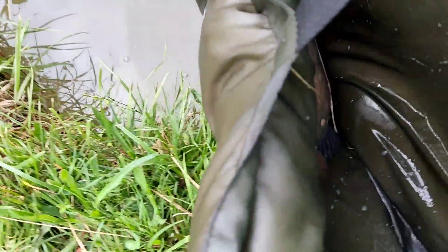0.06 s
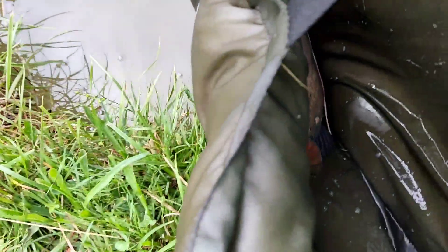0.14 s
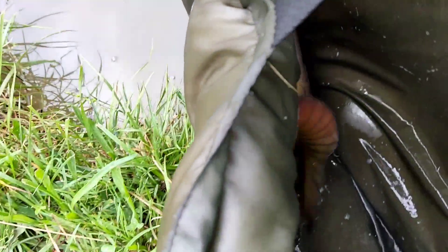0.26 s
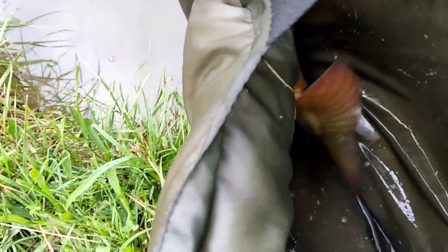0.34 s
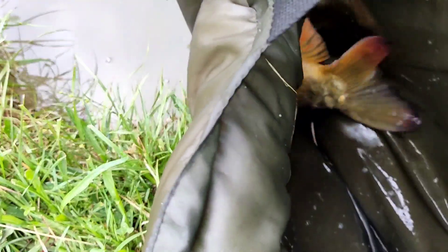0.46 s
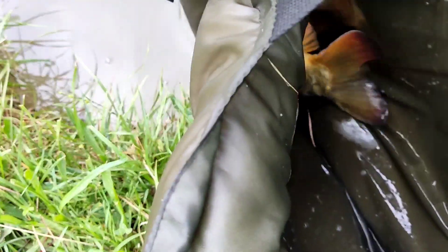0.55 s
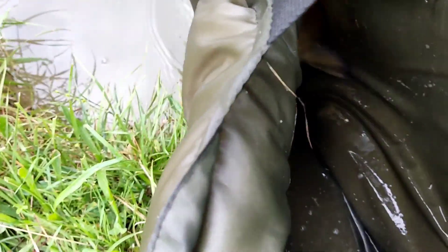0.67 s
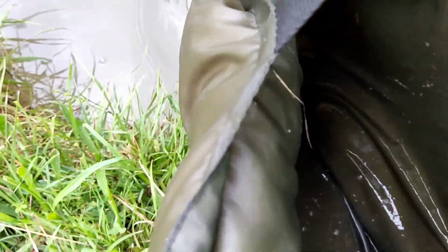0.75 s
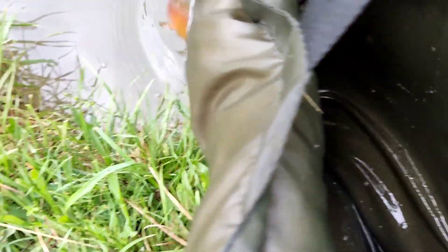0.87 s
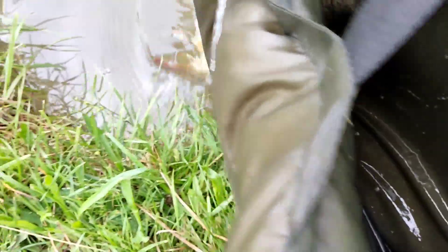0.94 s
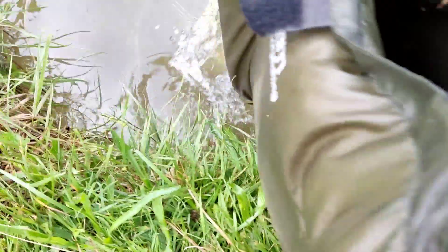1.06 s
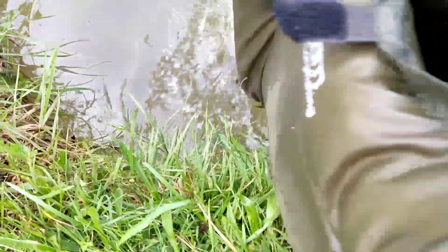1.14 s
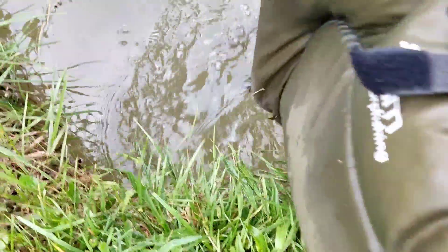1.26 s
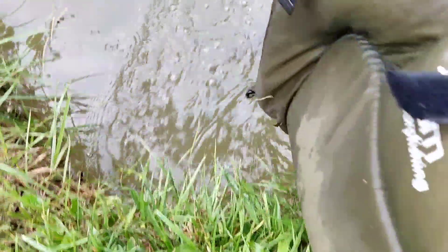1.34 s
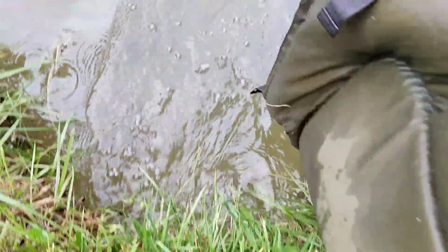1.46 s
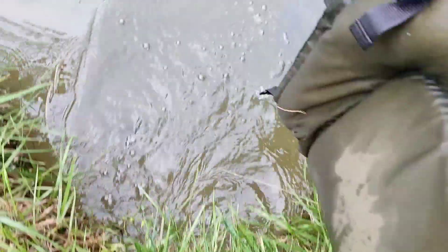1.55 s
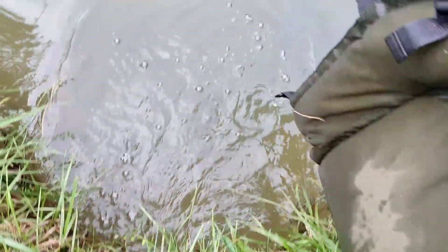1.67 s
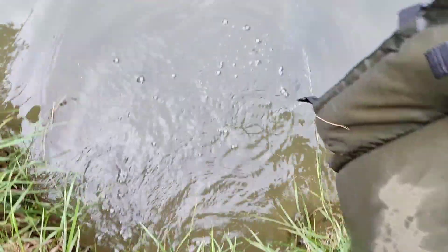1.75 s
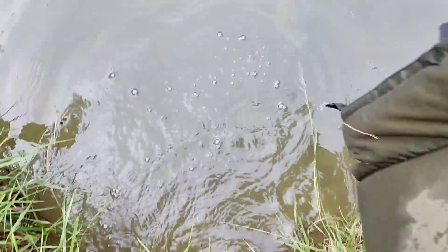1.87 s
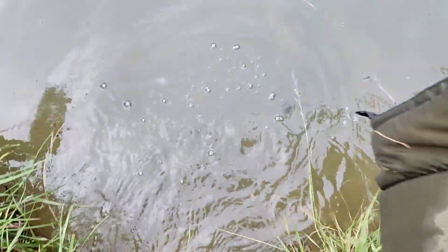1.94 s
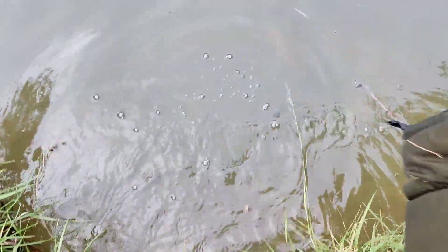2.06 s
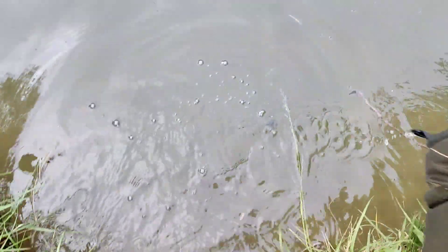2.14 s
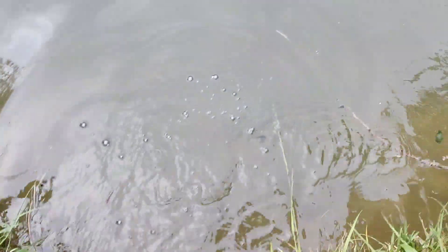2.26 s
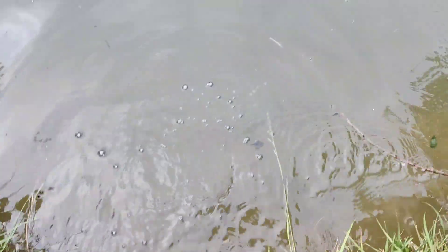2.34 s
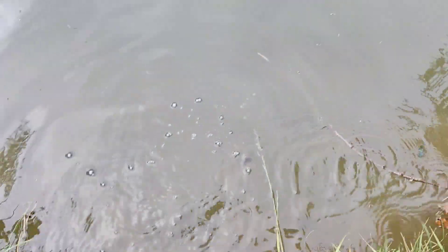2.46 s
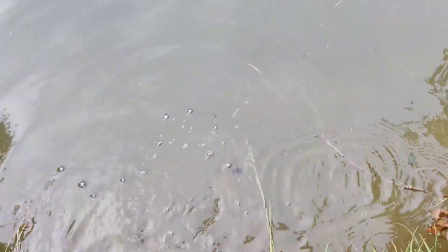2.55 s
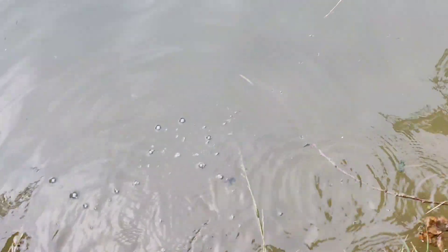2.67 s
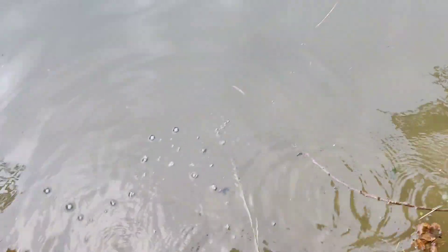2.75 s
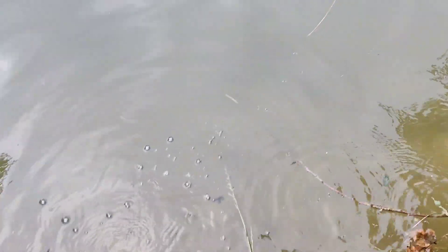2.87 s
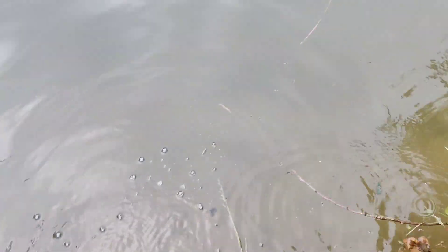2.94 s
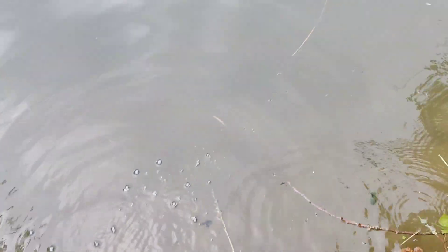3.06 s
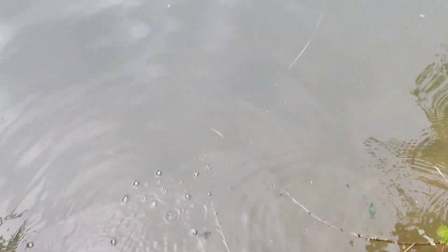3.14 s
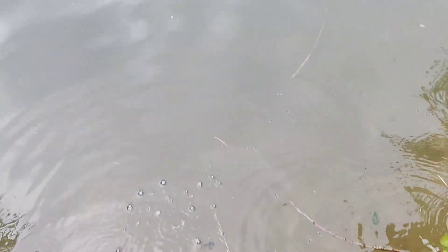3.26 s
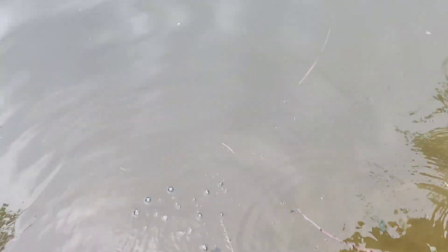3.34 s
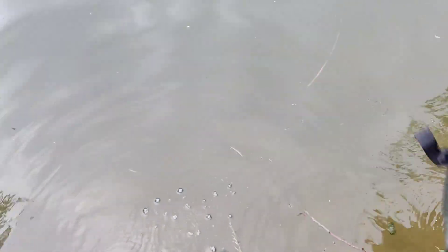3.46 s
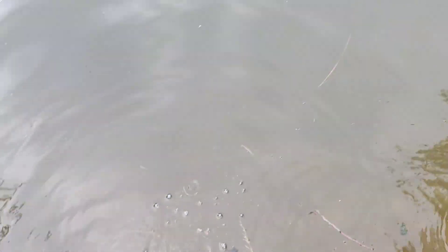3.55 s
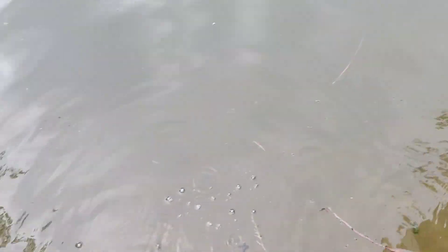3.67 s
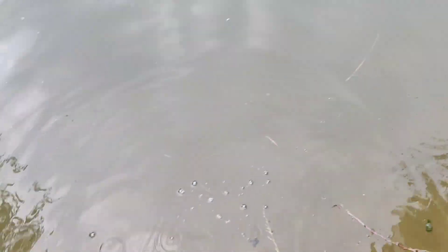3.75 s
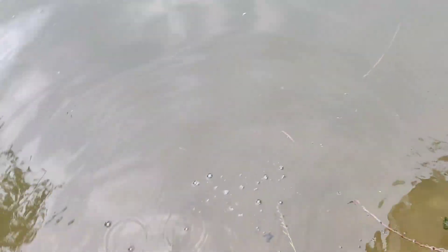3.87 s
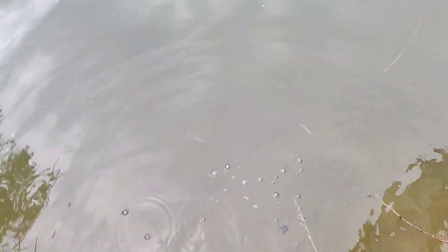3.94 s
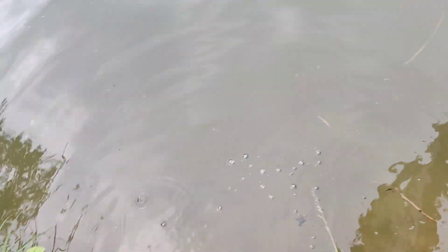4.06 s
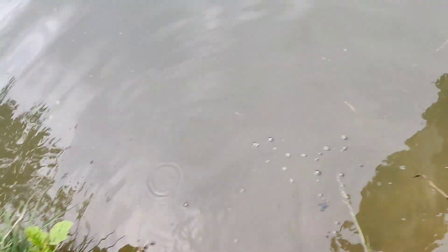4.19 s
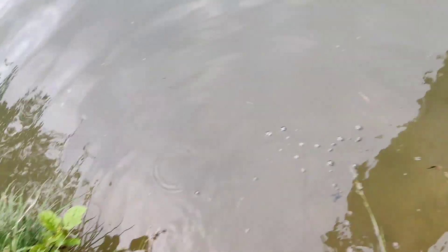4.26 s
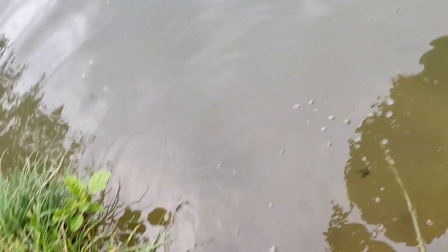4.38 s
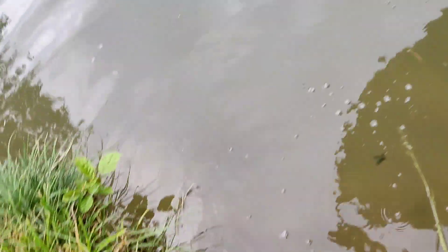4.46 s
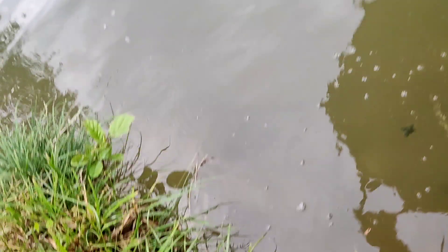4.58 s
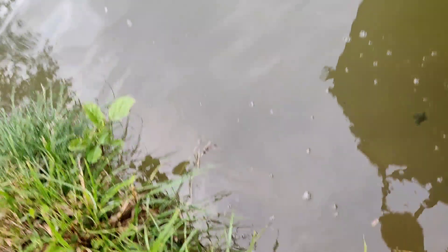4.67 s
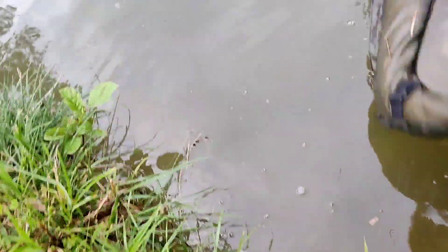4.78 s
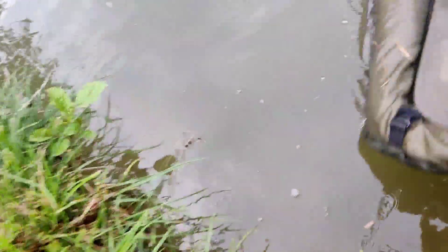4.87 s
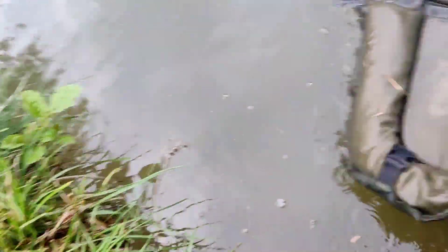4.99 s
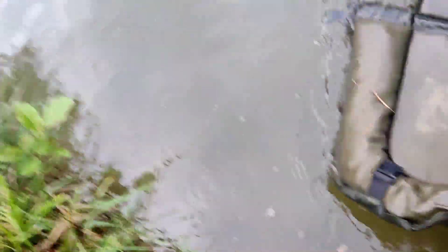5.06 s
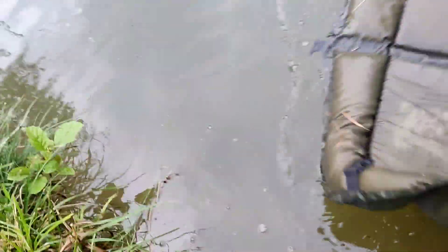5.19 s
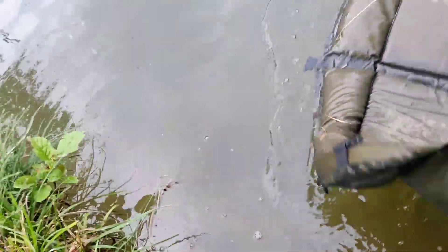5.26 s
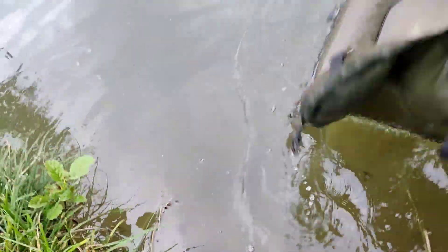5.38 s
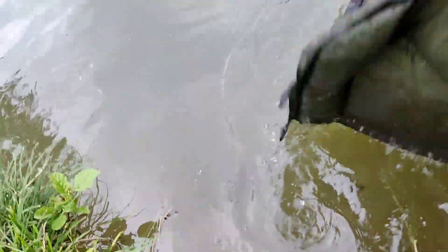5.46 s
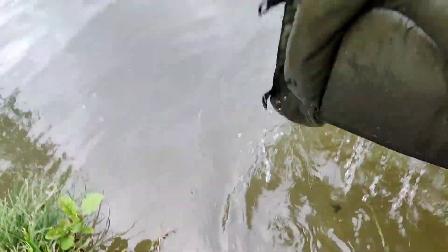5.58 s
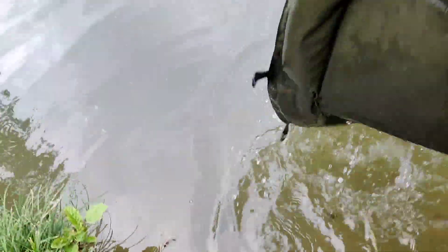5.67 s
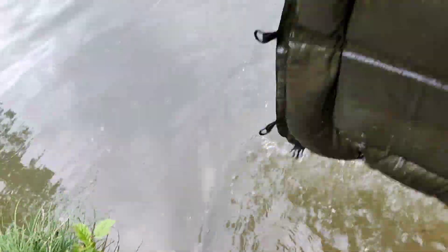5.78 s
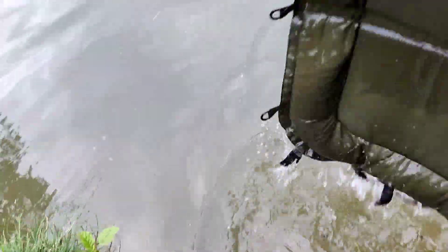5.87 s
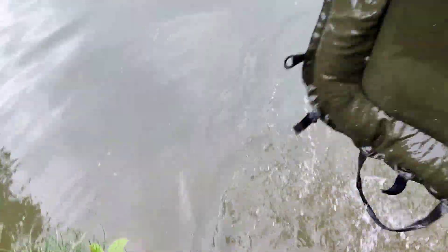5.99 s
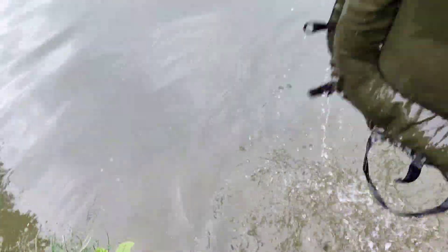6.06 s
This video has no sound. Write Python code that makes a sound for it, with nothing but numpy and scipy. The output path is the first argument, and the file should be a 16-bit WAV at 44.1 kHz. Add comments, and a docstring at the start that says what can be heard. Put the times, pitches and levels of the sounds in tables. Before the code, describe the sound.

A close, dry outdoor stereo perspective at a pond edge. From 0 to 0.85 s, wet fabric rustles softly with dull drag and airy hiss, with low wind bumps. At 0.9-1.5 s a lively splash erupts: sharp cloth snaps, plops, rising gurgles and crackling droplets, mostly centre to left. It thins to light rustle and drips by 2 s. Between 2 and 3.3 s a small bird gives thin, high, mostly falling whistles to the right, with one faint note near 4.05. Rustle swells around 3.1 and 3.5; a crisp tick lands at 4.0. At 4.75 a clustered, low wet slap thuds and sprays, leaving small gurgles. Soft swishing swells near 5.3 and 5.5, then from 5.7 to 6.1 strong rustling, bright snaps, bubbles and fine draining water. Faint traffic hum and leaf hiss continue throughout.

```python
"""Wet sling at a pond edge

A wet fishing sling is handled close to a phone with two microphone ports: shaped noise rustles,
short noise bursts snap, damped sines gurgle, and it slaps the surface with thuds and spray, then drains.
A small bird sings to the right in gliding sines. Filtered noise makes light wind buffeting the ports,
a far traffic hum and a hiss of leaves."""
import sys
import numpy as np
from scipy import signal
from scipy.fft import rfft, irfft, next_fast_len
from scipy.io import wavfile
from scipy.ndimage import uniform_filter1d, map_coordinates

SR = 44100
rng = np.random.default_rng(int(sys.argv[2]) if len(sys.argv) > 2 else 0)


def generate_wav(sig):
    """Save sig (samples, or channels by samples) to the path in sys.argv[1] as 16-bit PCM at SR."""
    pcm = np.round(np.clip(np.atleast_2d(sig).T, -1, 1) * 32767).astype(np.int16)
    wavfile.write(sys.argv[1], SR, pcm)


N = 270013

# Wind buffeting: t/s, level/dB
WIND_LEVEL = [(0, -47), (.26, -55.5), (.37, -39), (.54, -41.5), (.86, -50), (1.09, -41), (1.66, -50),
              (2.55, -51), (2.64, -43), (3.14, -53.5), (3.81, -47), (4.1, -47.5), (4.2, -44), (4.28, -49.5),
              (4.55, -40), (4.65, -47), (4.72, -40), (4.84, -46.5), (5.3, -48.5), (6.12, -49.5)]
# Snaps of wet fabric and droplets: t/s, bright level/dB, left-right/dB, knock relative to bright/dB, bright T60/s
SNAPS = [(.808, -33.5, 6, -8, 0.047), (0.9334, -20.5, 0.5, -7, 0.02), (1.0179, -20.5, -6, 1, 0.014),
         (1.026, -20.5, -5.5, -24, 0.014), (1.05, -15.5, -13, -13.5, 0.0083),
         (1.068, -27.5, -5, -15, 0.035), (1.108, -27, -5.5, -1.5, 0.027), (1.114, -28.5, -22, -23, 0.013),
         (1.168, -35, -7, -22, 0.0054), (1.1938, -35, -15, 2, 0.028), (1.306, -21, -4.5, -21, 0.011),
         (1.408, -30, -12, -25, 0.0076), (1.43, -33, -16, -7, 0.025), (1.448, -29, -4.5, -6.5, 0.019),
         (1.482, -31.5, -7.5, -6, 0.018), (1.779, -33, 3, -4, 0.009), (2.0127, -24.5, -1, -17, 0.0057),
         (2.034, -40, 0.5, -3, 0.032), (2.5763, -30.5, 2.5, -9.5, 0.007), (3.065, -32.5, 10, -37, 0.052),
         (3.5154, -35, -1, 3.5, 0.035), (3.9802, -16.5, -1.5, -18.5, 0.0031),
         (4.1267, -49, -9, -12, 0.0057), (4.138, -33, 2, -13, 0.0087), (4.1612, -36.5, 10, -13, 0.0094),
         (4.347, -36.5, 15, -20, 0.0079), (4.359, -35.5, 9, -14, 0.014), (4.971, -22.5, -1, -9, 0.0057),
         (5.07, -20, 3, -46.5, 0.0098), (5.5134, -21, 5, -7, 0.0094), (5.5289, -30.5, 16, -11, 0.015),
         (5.723, -12, -1, -31, .011), (5.778, -23.5, -1, -9, 0.026), (5.7867, -18.5, -7, -3, 0.009),
         (5.9117, -8.5, -1.5, -43, 0.0062), (5.946, -26, 2, -25, .008)]
# Air bubbles in moving water, before flutter and echo:
# t/s, level/dB, f/Hz, cycles, pitch rise over those cycles/fraction
BUBBLES = [(0.918, -21.5, 487, 2.8, 0), (.934, -17, 610, 1.2, 0.2), (.968, -38, 540, 7.9, 0),
           (.993, -21, 750, 3.4, 0), (1.019, -26, 289, 7.2, 0.3), (1.021, -26.5, 1267, 14, 0),
           (1.053, -37, 2950, 32, 0.05), (1.055, -34, 442, 10, 0.02), (1.087, -29, 1300, 6, 0),
           (1.109, -13, 1150, 3.2, 0), (1.113, -32, 753, 10, 0.14), (1.201, -29, 905, 5.3, 0),
           (1.253, -34.5, 1096, 14, 0), (1.282, -34, 2080, 19, 0.02), (1.311, -39, 1220, 15, 0.3),
           (1.436, -37.5, 602, 14, 0.13), (1.475, -34.5, 1310, 16, 0.41), (1.512, -46, 1060, 29, 0.22),
           (4.468, -39, 480, 4.5, 0.03), (4.797, -35, 563, 11, 0.01), (4.83, -35, 730, 6.4, 0.1),
           (4.851, -43, 1040, 11, .4), (4.885, -47, 2150, 20, .06), (4.93, -46, 743, 9.3, 0),
           (4.951, -45.5, 1174, 31, 0), (5.031, -42.5, 960, 7.5, .3), (5.076, -47.5, 1180, 11.5, 0.33),
           (5.18, -26.5, 780, 1.2, 0), (5.512, -41, 1890, 15, 0.1), (5.712, -41.5, 770, 30, 0.1),
           (5.772, -30.5, 168, 5, 0.22), (5.79, -36, 748, 37, 0.01), (5.836, -25.5, 684, 12.4, 0),
           (5.922, -32, 1650, 8.9, 0.1)]
# Folds landing one after another in the slap: t/s, spray level/dB, thud level/dB, thud f/Hz
SLAP_FOLDS = [(4.7515, -16.5, -1.5, 210), (4.756, -11, -17, 232), (4.7623, -20.5, -6, 185),
              (4.769, -10.5, -5.5, 520), (4.775, -16.5, -20, 296), (4.779, -17, -7, 225),
              (4.783, -25, -6.5, 296), (4.789, -39, -17, 250)]
# Whistles, before quaver, echo and panning:
# t/s, length/s, first f/Hz, last f/Hz, bend (over 1 glides late), level/dB
WHISTLES = [(1.978, 0.19, 7800, 7100, 0.34, -52.5), (2.189, 0.13, 7270, 6340, 1.6, -51),
            (2.391, 0.1, 6800, 5870, 1.1, -53), (2.393, 0.12, 7220, 6810, 1.6, -55.5),
            (2.4, 0.088, 8200, 7400, 2.5, -52), (2.579, .1, 6550, 5370, 0.92, -55.5),
            (2.776, 0.062, 5420, 5500, 1.3, -69), (2.85, 0.045, 6300, 5870, .7, -59),
            (2.895, 0.115, 5850, 6280, .9, -57.5), (3.258, 0.05, 5880, 5900, 1, -58),
            (4.04, 0.07, 5040, 4170, 0.37, -64)]
# Spectrum of fabric hiss and leaves: f/Hz, relative level/dB
HISS_SPECTRUM = [(2000, -18.5), (3000, -7.5), (4300, -8), (5200, -5), (7400, 1), (8500, 7), (9500, 5),
                 (11100, 5), (13000, -2.5), (14300, -7), (14450, -66)]
# Spectrum of the dull cloth drag: f/Hz, relative level/dB
DRAG_SPECTRUM = [(120, -8), (200, -9.5), (443, -4), (709, -5), (812, -5), (1180, -5), (1610, -5.5),
                 (2760, -8), (5000, -10.5), (6500, -11), (11000, -120)]
# Spectrum of the wind: f/Hz, relative level/dB
WIND_SPECTRUM = [(12, 1.5), (20, 7), (64, -2.5), (167, -12.5), (260, -19.5), (340, -57), (570, -120)]
# Spectrum of the far traffic: f/Hz, relative level/dB
TRAFFIC_SPECTRUM = [(60, -5), (100, -0.5), (205, 15.5), (400, -2), (1000, -4.5), (5000, -82)]
# Resonances of the two ports: f/Hz, left-right/dB
PORT_RESONANCE = [(300, 0.3), (1400, 0.9), (4000, -0.8), (6500, -2), (8300, -7.5), (9600, -2), (11100, 13),
                  (13200, 8)]
# Likeness of broad noise at the two ports: f/Hz, correlation
LIKENESS = [(150, 0.87), (600, 0.52), (2000, 0.043), (5000, 0.042), (12000, 0.14)]
# Draining water: t/s, level/dB
POUR_LEVEL = [(5.68, -64), (5.74, -51), (5.8, -41.5), (5.93, -43), (6.0, -43), (6.12, -48.5)]
# Moves of the sling, each a swell of rustle:
# t of full level/s, rise/s, hold/s, hiss fade/(dB/s), hiss level/dB, drag level/dB
MOVES = [(0.51, 0.88, 0.34, 60, -46, -48), (0.947, 0.054, .005, 97, -39, -43.5),
         (1.054, 0.14, 0.11, 109, -41, -47), (1.287, 0.095, .005, 90, -40.5, -43.5),
         (1.442, 0.063, 0.0041, 195, -41.5, -41.5), (1.486, 0.041, 0.024, 27, -51.5, -57),
         (1.625, 0.052, 1, 52, -54, -60.5), (2.02, 0.078, .005, 41, -49.5, -62),
         (2.38, 0.17, .005, 67, -50.5, -74), (2.817, 0.97, 0.015, 160, -48, -53),
         (3.068, 0.22, .005, 102, -46, -77), (3.147, 0.17, 0.023, 57, -42, -45.5),
         (3.48, 0.46, .005, 51, -48.5, -47.5), (3.51, 0.028, 0.15, 59, -37, -43),
         (4.156, 0.78, 0.0045, 106, -55, -59), (4.38, 0.24, 0.058, 64, -54.5, -56.5),
         (4.608, 0.21, .005, 232, -46, -60), (4.766, 0.074, .005, 43, -36, -42),
         (5.266, 0.37, .005, 58, -43, -51.5), (5.526, 0.28, .005, 65, -50, -49),
         (5.703, 0.79, .005, 57, -43, -51), (5.773, 0.15, 0.17, 109, -35, -42.5),
         (6.02, 0.044, .005, 12, -42, -47.5)]
# Position of the sling: t/s, left-right/dB
SLING_SIDE = [(0, -1), (.6, 1.5), (1.05, -4.5), (1.45, -1.5), (1.57, 3), (2.5, 1.5), (3.1, 6), (4.6, 1.5),
              (5.7, 2.5), (5.93, -2), (6.12, 1.5)]
# Share of flying droplets: t/s, share (0-1)
WETNESS = [(.85, .4), (.95, 1), (1.5, 1), (2.1, .4), (5.6, .4), (5.75, .6)]
# Spectra of the snap's crack and knock, and of the slap's spray: f/Hz, relative level/dB
CRACK_SPECTRUM = [(2500, -23), (4000, -3.0), (7000, 7), (9000, 13), (11500, 9.5), (14000, -2.0), (16000, -49.0)]
KNOCK_SPECTRUM = [(200, 5.0), (500, -0.5), (1500, 0.5), (3500, -0.5), (5000, 3.5), (8000, -37)]
SPRAY_SPECTRUM = [(300, -2.5), (800, -8.5), (2000, -15.5), (3500, -3.0), (6500, -17), (9000, 3.5),
                  (11500, -6.5), (14300, -19), (14700, -59)]
# Likeness of the wind and of the leaves at the two ports: f/Hz, correlation
WIND_LIKENESS = [(30, 0.014), (70, 0.74), (130, 0.81)]
LEAF_LIKENESS = [(1000, .2)]

TOP_HZ = 15520  # band limit of both ports
RISE_DB = 20  # a move climbs this far during its rise
DRAG_FADES = 1.35  # the drag dies this many times faster than the hiss
NOTE_EDGE_S = 0.0021  # fade at each end of a whistle
SLING_LEAD_S = 0.000289  # lead at the left port for cloth on the left


def amp(db):
    """Gain of a level in dB."""
    return 10 ** (np.asarray(db) / 20)


def unit(x):
    """x at rms 1."""
    return x / np.sqrt(np.mean(x ** 2) + 1e-20)


def along(points, hz):
    """Read (Hz, value) points on a log frequency axis."""
    f, v = np.transpose(points)
    return np.interp(np.log(hz + 1), np.log(f + 1), v)


def curves(rows):
    """One value per sample for each column after the time."""
    s, *cols = np.transpose(rows)
    return [np.interp(np.arange(N) / SR, s, c) for c in cols]


def wobble(rate):
    """A smooth random curve, rate knots a second."""
    knots = rng.standard_normal(int(N * rate / SR) + 4)
    return map_coordinates(knots, [np.arange(N) * rate / SR])


def filtered(x, response):
    """x shaped by a complex response of frequency."""
    m = next_fast_len(N + SR // 2)
    return irfft(rfft(x, m) * response(np.fft.rfftfreq(m, 1 / SR)), m)[..., :N]


def sides(pan_db):
    """Left and right gains for a left-right difference in dB."""
    return amp(np.array([pan_db, -pan_db]) / 2)


def lead(x, s):
    """The left port hears s seconds before the right."""
    return filtered(x, lambda hz: np.exp(1j * np.pi * s * hz * np.array([[1], [-1]])))


def add(out, s, x):
    """Mix x into out from time s."""
    part = out[..., round(s * SR):][..., :x.shape[-1]]
    part += x[..., :part.shape[-1]]


def echo(x, t60):
    """A scattered noise tail, different at each port, scaled to energy 1 at the left."""
    t = np.arange(SR // 3) / SR
    tail = rng.standard_normal((2, len(t))) * amp(-60 * t / t60)
    return signal.fftconvolve(x[None], tail / np.linalg.norm(tail[0]), axes=1)[:, :N]


def rush(spectrum, alike, patchy_db, lead_s, grain=1):
    """Stereo noise of rms 1 with patches of random gain, lead_s earlier at the left port."""
    z = signal.stft(rng.standard_normal((2, N + 512)), nperseg=512)[2]
    # patches spread over neighbouring frequencies and moments
    field = uniform_filter1d(rng.standard_normal(z.shape[1:]), size=6, axis=0)
    field = uniform_filter1d(field, size=8, axis=1)
    patchy = signal.istft(z * amp(patchy_db * unit(field)), nperseg=512)[1][:, :N]

    def mid_side(hz):
        # this balance of mid and side gives the wanted correlation
        turn = np.arccos(np.clip(along(alike, hz), -1, 1)) / 2
        return amp(along(spectrum, hz)) * [np.cos(turn), np.sin(turn)]

    mid, side = filtered(grain * patchy, mid_side)
    return unit(lead(np.array([mid + side, mid - side]), lead_s))


def cracks(times, levels_db, pan_db, t60s, spectrum, attack_s):
    """Short noise bursts, partly alike at both ports; the further left, the later at the right port."""
    out, t = np.zeros((2, N)), np.arange(SR // 25) / SR
    for s, db, pan, t60 in zip(times, levels_db, pan_db, t60s):
        shape = amp(db - 60 * t / t60) * (1 - np.exp(-(t / attack_s) ** 2))
        shared, own_left, own_right = rng.standard_normal((3, len(t)))
        left, right = sides(pan)
        right_delay_s = np.clip(.00012 + pan * .00004, -.0002, .0003)
        add(out[0], s, left * shape * (shared + 0.7 * own_left))
        add(out[1], s + right_delay_s, right * shape * (shared + 0.69 * own_right))
    hz = np.linspace(0, SR / 2, num=500)
    spectrum_rms = np.sqrt(np.mean(amp(along(spectrum, hz)) ** 2))
    return filtered(out, lambda f: amp(along(spectrum, f))) / spectrum_rms


def bubble(hz, cycles, rise):
    """A damped sine; a positive rise lifts its pitch as a bubble nears the surface."""
    u = np.arange(int(2 * cycles / hz * SR)) / SR * hz / cycles  # 1 after the given cycles
    tone = np.sin(2 * np.pi * cycles * (u + rise * u * u / 2))
    return tone * amp(-17 * u) * (1 - np.exp(-u * cycles))


def froth(t0, t1, low_hz, octaves, cycles, count):
    """Many small bubbles at random moments, rms 1 across their span."""
    out = np.zeros(N)
    for when, pitch, life, size in rng.random((count, 4)):
        note = bubble(low_hz * 2 ** (octaves * pitch), cycles * (1 + 2 * life), rise=0.2)
        add(out, t0 + when * (t1 - t0), amp(-26 * size) * note)
    return unit(out) * np.sqrt((t1 - t0) * SR / N)


def moves():
    """Levels of hiss and drag: every move rises, holds and fades; their powers add."""
    s, rise, hold, fade, hiss_db, drag_db = np.transpose(MOVES)[..., None]
    t = np.arange(0, N, 32) / SR  # a coarse time grid is enough for swells
    before = RISE_DB * np.clip(s - t, 0, None) / np.abs(rise)
    after = fade * np.clip(t - s - np.abs(hold), 0, None)

    def total(db):
        return np.interp(np.arange(N) / SR, t, np.sqrt(np.sum(amp(db) ** 2, axis=0)))

    return total(hiss_db - before - after), total(drag_db - before - DRAG_FADES * after)


def surroundings():
    """Low noise for a far, slowly swaying hum of traffic; bright noise for a steady hiss of leaves."""
    hum_gain = amp(-66.0 + 2.5 * wobble(6.2))
    hum = hum_gain * rush(TRAFFIC_SPECTRUM, LIKENESS, patchy_db=2.5, lead_s=0)
    leaves = rush(HISS_SPECTRUM, LEAF_LIKENESS, patchy_db=1.2, lead_s=0)
    return hum + amp(-79) * leaves


def wind():
    """Lumpy low noise of wind buffeting the ports, with partly separate lumps at each."""
    lumps = amp(1.4 * wobble(11) + 1.97 * np.array([wobble(23), wobble(27)]))
    gusts = rush(WIND_SPECTRUM, WIND_LIKENESS, patchy_db=2.5, lead_s=0)
    return amp(curves(WIND_LEVEL)[0]) * unit(lumps * gusts)


def bird():
    """Thin, slightly unsteady gliding sines with a short echo among the trees."""
    song, quaver_hz = np.zeros(N), 45 * wobble(130)
    for s, length, first_hz, last_hz, bend, db in WHISTLES:
        t = np.arange(0, length, 1 / SR)
        edge = np.clip(np.minimum(t, length - t) / NOTE_EDGE_S, 0, 1)
        glide_hz = first_hz + (last_hz - first_hz) * (t / length) ** bend
        hz = glide_hz + quaver_hz[round(s * SR):][:len(t)]
        add(song, s, edge * amp(db) * np.sin(2 * np.pi * np.cumsum(hz) / SR))
    song = song * amp(2 * wobble(45) + 3.5 * wobble(350))  # unsteady loudness
    heard = .55 * song + .6 * echo(song, .15)
    return heard * amp([[-5], [4]])  # to the right


def water():
    """Larger bubbles stand out as damped sines; small ones fill the splash, the later wash and the pour."""
    notes = np.zeros(N)
    for s, db, hz, cycles, rise in BUBBLES:
        add(notes, s, amp(db) * bubble(hz, cycles, rise))
    notes = notes * amp(1.1 * wobble(150))  # neighbouring bubbles and the moving surface shake each note
    wash = froth(.9, 2.1, 456, 2.6, 5.9, count=260) + 0.68 * froth(5.2, 5.6, 497, 1.6, 6.8, count=70)
    wash += 0.98 * froth(.9, 1.55, 806, 2.45, 0.9, count=90)  # droplets landing: ticks with hardly any note
    _, drag_gain = moves()
    notes += amp(-6) * drag_gain * wash  # the wash follows the sling
    pour = amp(curves(POUR_LEVEL)[0]) * froth(POUR_LEVEL[0][0], N / SR, 1250, .85, 4.5, count=600)
    notes = .88 * notes + .48 * echo(notes, .07)[0]  # bank and folds smear these notes
    return notes + lead(np.array([pour, pour]), 0.00014)


def slap():
    """Every fold thuds on the water as a brief damped sine and throws a burst of spray noise."""
    s, spray_db, thud_db, thud_hz = np.transpose(SLAP_FOLDS)
    thud = np.zeros(N)
    for at, db, hz in zip(s, thud_db, thud_hz):
        add(thud, at, -amp(db) * bubble(hz, 0.9, rise=-0.056))  # the pitch sinks slightly
    pan_db, t60 = np.full(len(s), 1.1), np.full(len(s), .035)
    spray = cracks(s, spray_db, pan_db, t60, SPRAY_SPECTRUM, attack_s=0.0018)
    thud_gains = amp([[.8], [-.8]])  # +0.8 dB left, -0.8 dB right: factors 1.10 and 0.91
    return thud * thud_gains + spray


def snaps():
    """Each snap is a bright crack of noise with a duller, slightly longer, evenly loud knock at both ports."""
    s, db, pan_db, low_db, t60 = np.transpose(SNAPS)
    crack = cracks(s, db, pan_db, t60, CRACK_SPECTRUM, attack_s=0.0009)
    knock = cracks(s, db + low_db, 0 * s, t60 + 0.004, KNOCK_SPECTRUM, attack_s=0.0014)
    return crack + knock


def fabric():
    """Countless fibres and droplets let go: a bright hiss over the dull drag of the cloth."""
    hiss_gain, drag_gain = moves()
    (pan_db,), (wet,) = curves(SLING_SIDE), curves(WETNESS)
    # flying droplets crackle most in the first splash and the final pour
    droplets = (rng.random(N) < 220 / SR) * rng.exponential(1, N)  # about 220 a second
    crackle = 1 + .6 * wet * uniform_filter1d(droplets * 60, size=60)
    hiss_grain = crackle * amp(wet * (1.6 * wobble(40) + 1.7 * wobble(20)) + .8 * wobble(60))
    # cloth on the left is earlier at the left port; otherwise both hear it together
    left = np.clip((pan_db + 2.5) / 5, 0, 1)

    def place(spectrum, patchy_db, grain):
        early_left = rush(spectrum, LIKENESS, patchy_db, SLING_LEAD_S, grain)
        together = rush(spectrum, LIKENESS, patchy_db, 0, grain)
        return np.sqrt(left) * early_left + np.sqrt(1 - left) * together

    hiss = place(HISS_SPECTRUM, 1.5, hiss_grain) * sides(pan_db)  # only the hiss is panned by level
    drag_grain = amp(wet * (2.5 * wobble(45) + 3.2 * wobble(16)) + 1.2 * wobble(70))
    drag = place(DRAG_SPECTRUM, 1.9, drag_grain)
    return hiss_gain * hiss + drag_gain * drag


def scene():
    """All sources at the two ports."""
    return fabric() + snaps() + water() + slap() + bird() + wind() + surroundings()


def record(dry):
    """Each port has its own resonances; nothing is kept above the band limit."""
    return filtered(dry, lambda hz: sides(along(PORT_RESONANCE, hz)) * (hz < TOP_HZ))


dry = scene()
out = record(dry)
generate_wav(out)
```